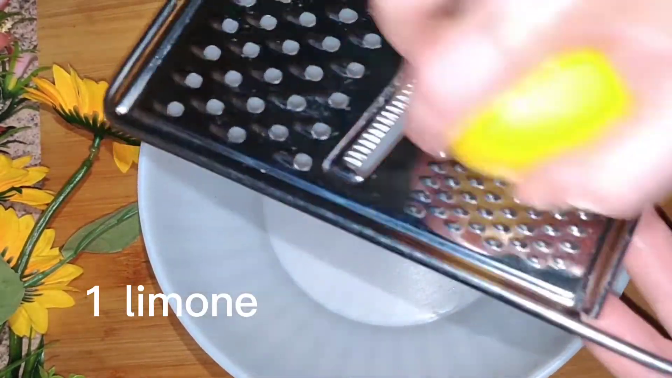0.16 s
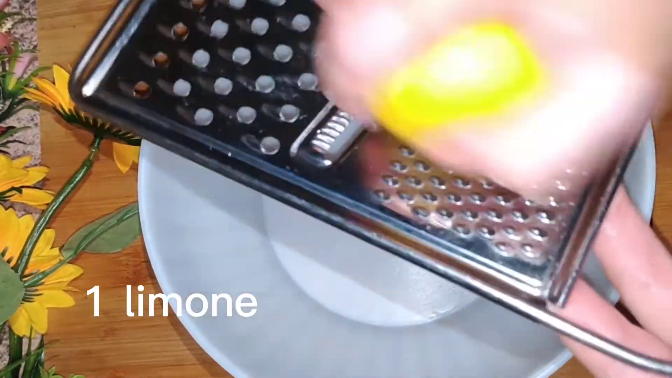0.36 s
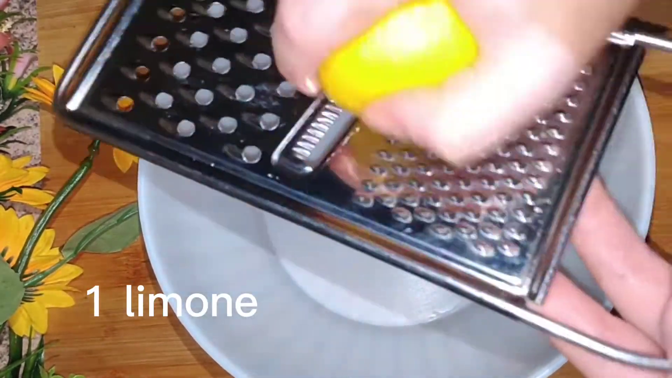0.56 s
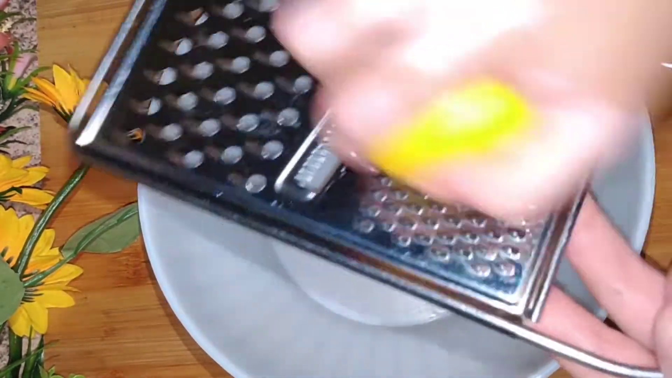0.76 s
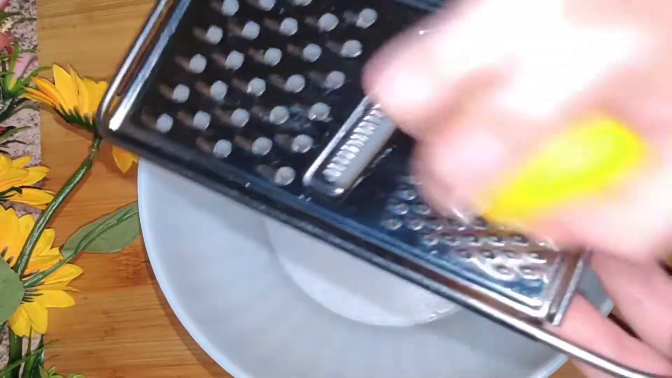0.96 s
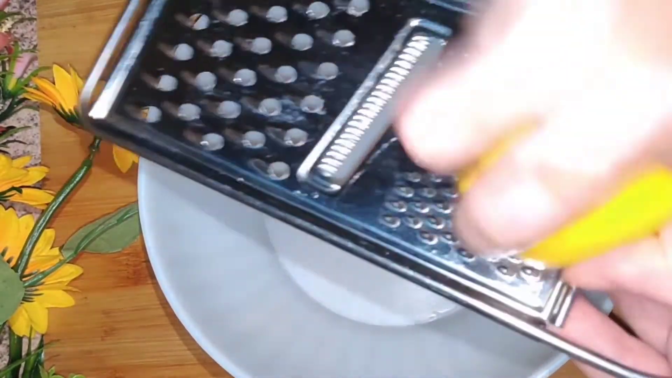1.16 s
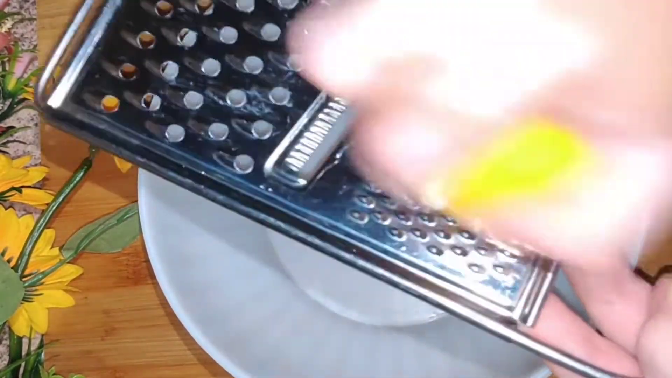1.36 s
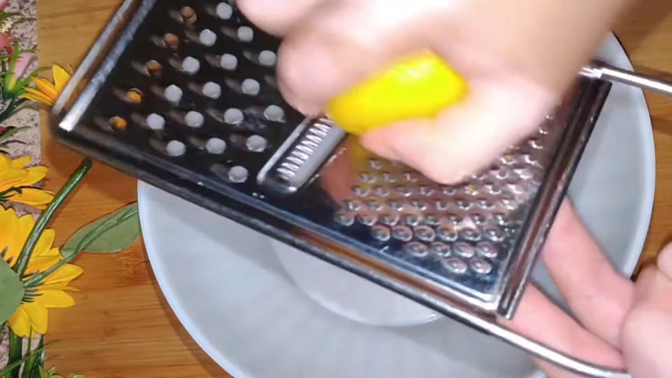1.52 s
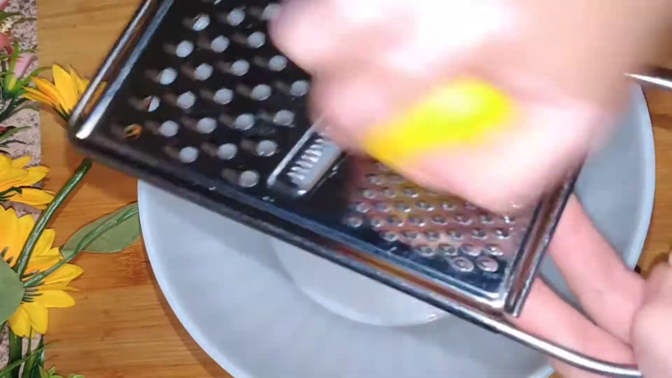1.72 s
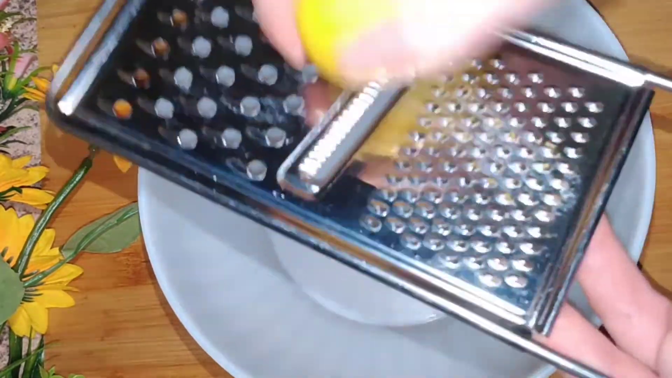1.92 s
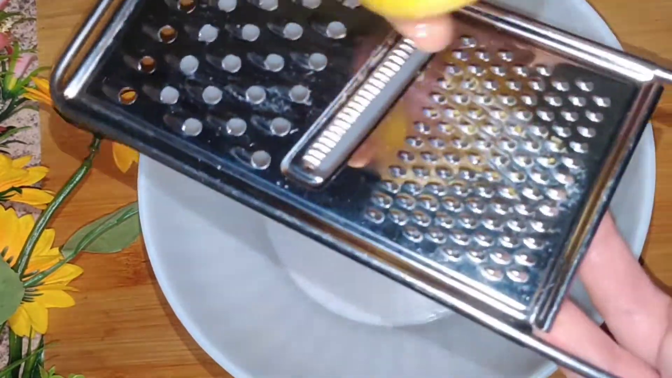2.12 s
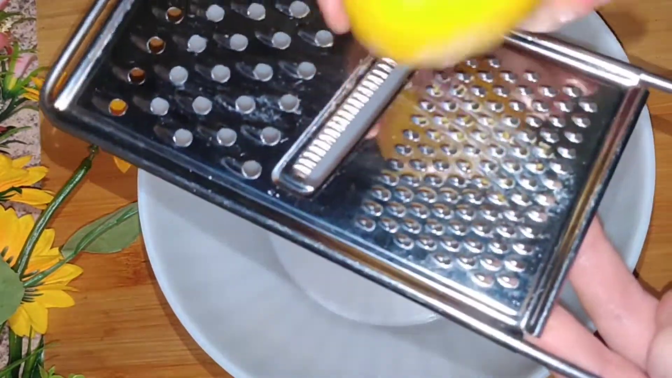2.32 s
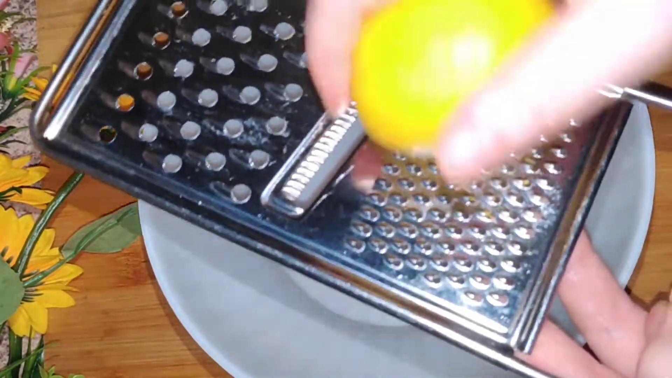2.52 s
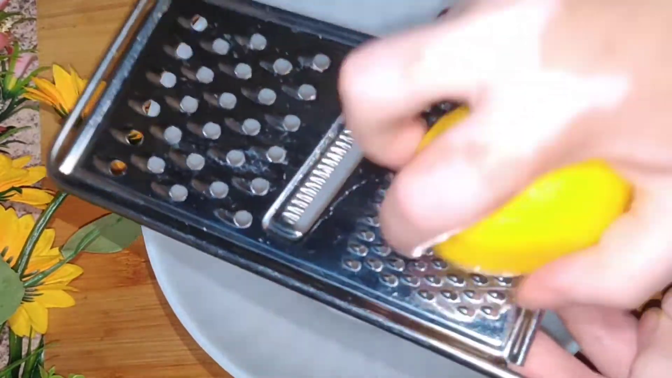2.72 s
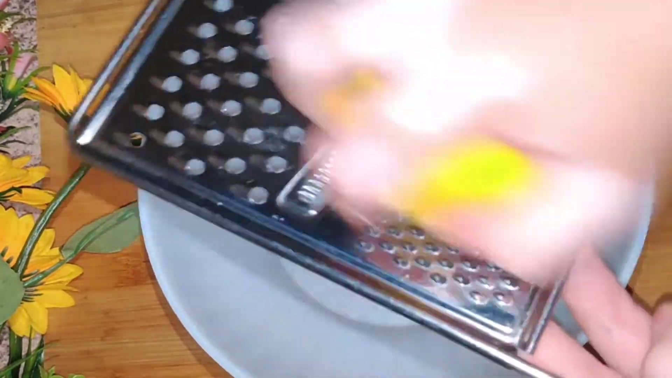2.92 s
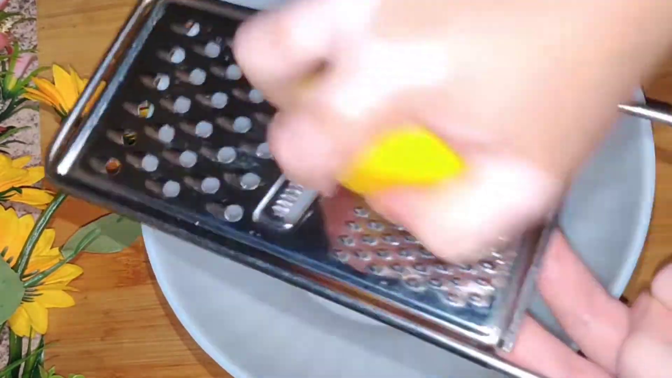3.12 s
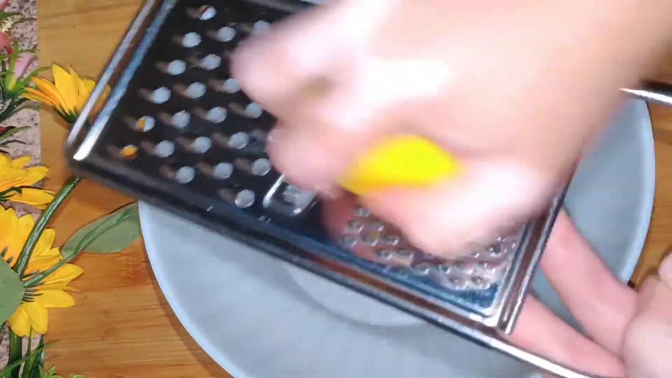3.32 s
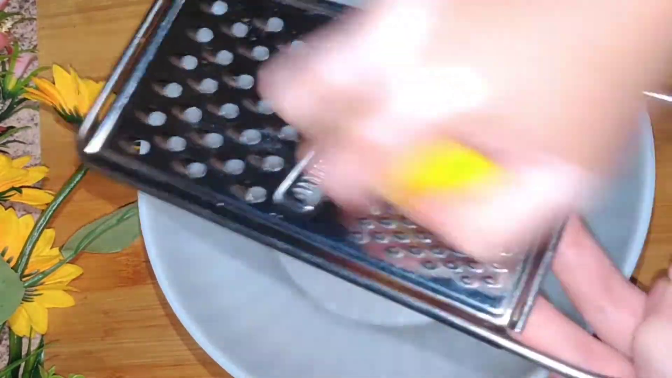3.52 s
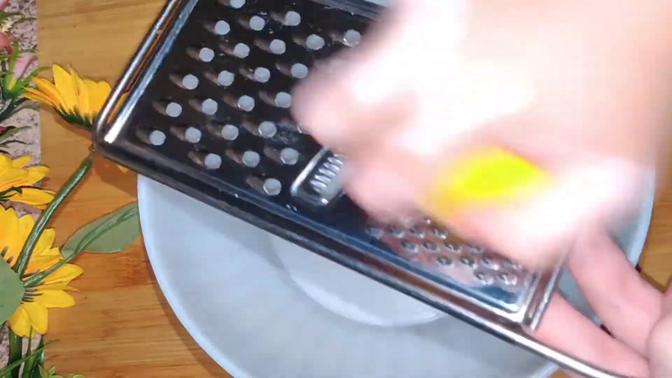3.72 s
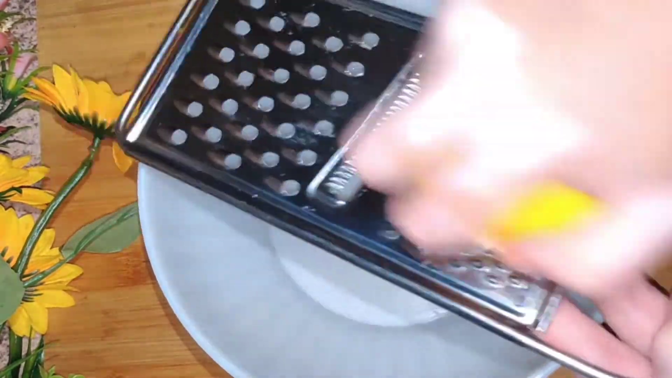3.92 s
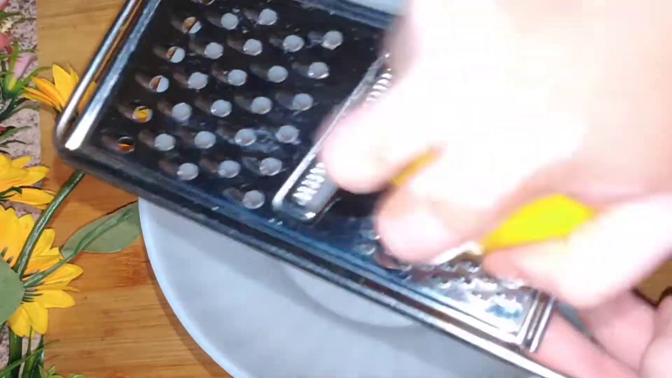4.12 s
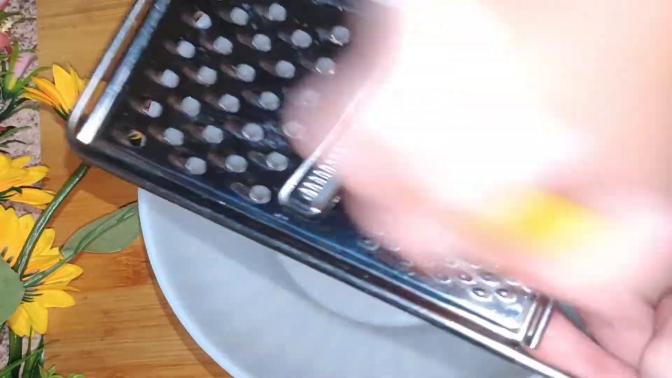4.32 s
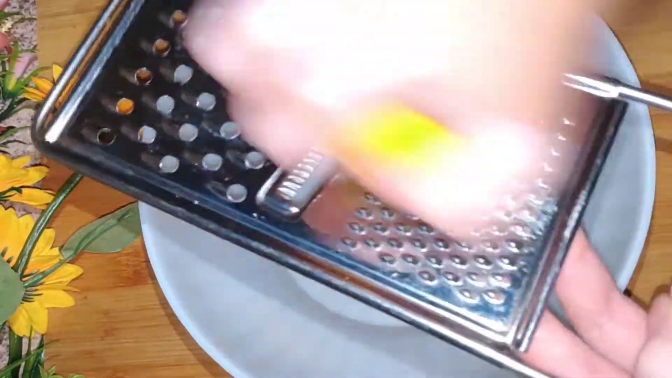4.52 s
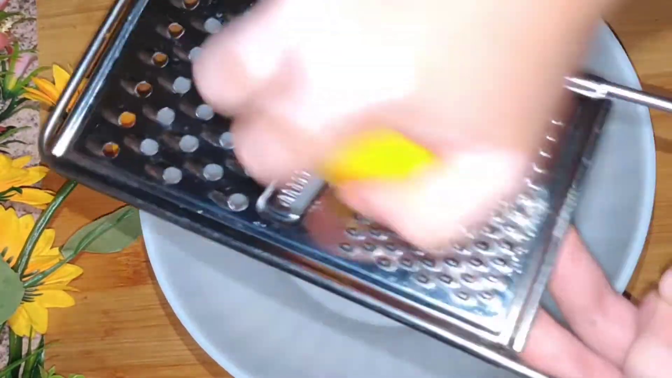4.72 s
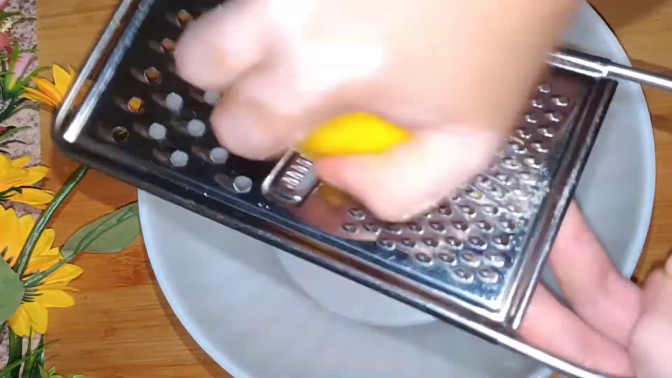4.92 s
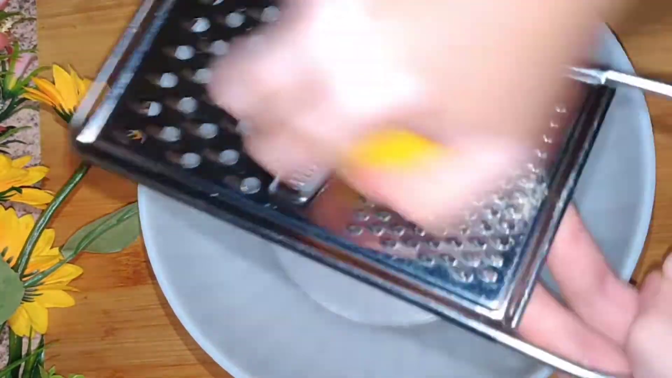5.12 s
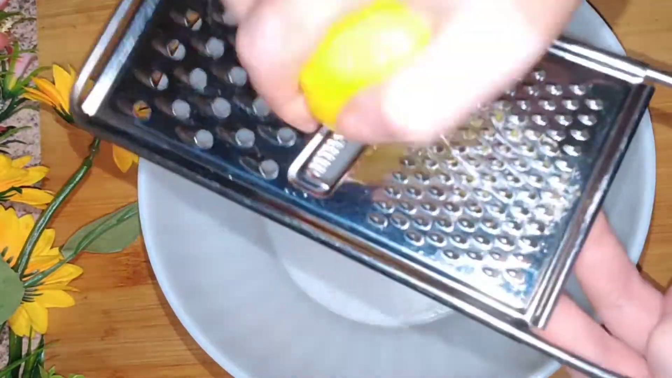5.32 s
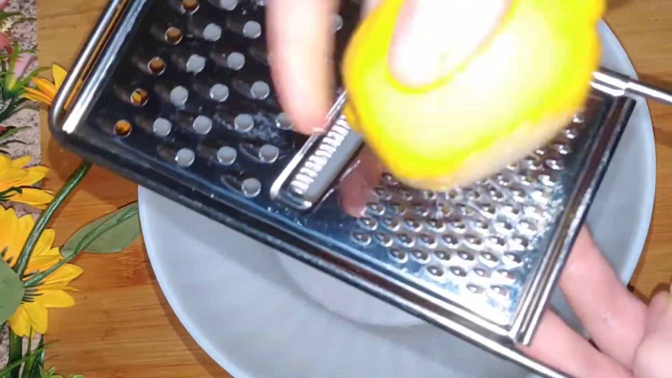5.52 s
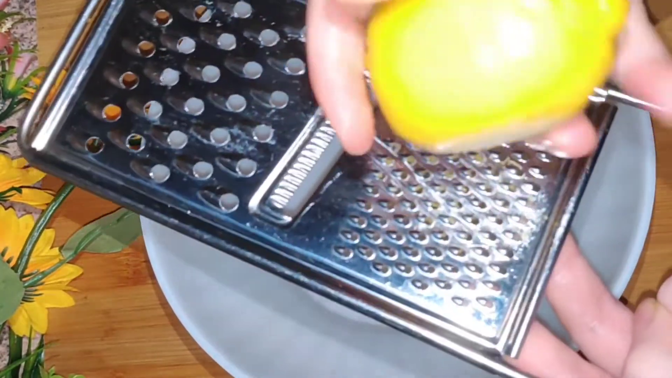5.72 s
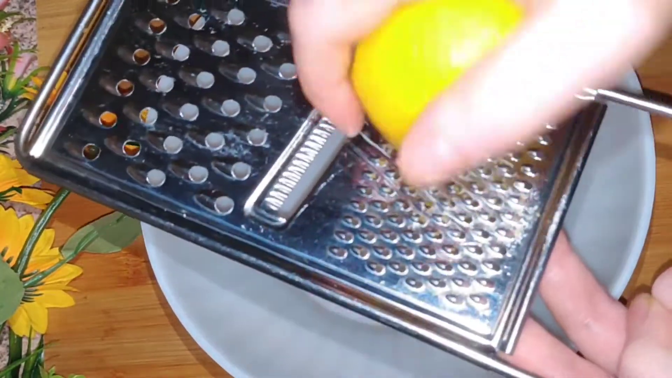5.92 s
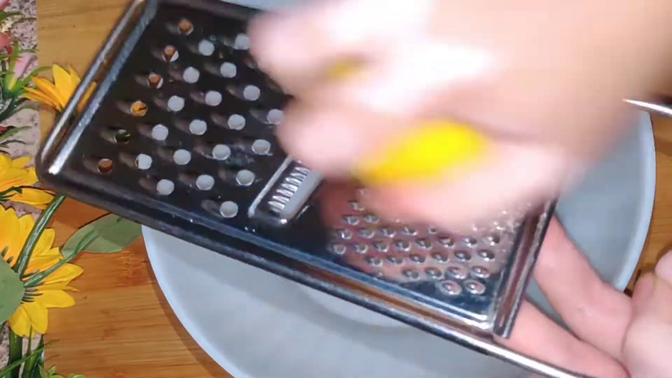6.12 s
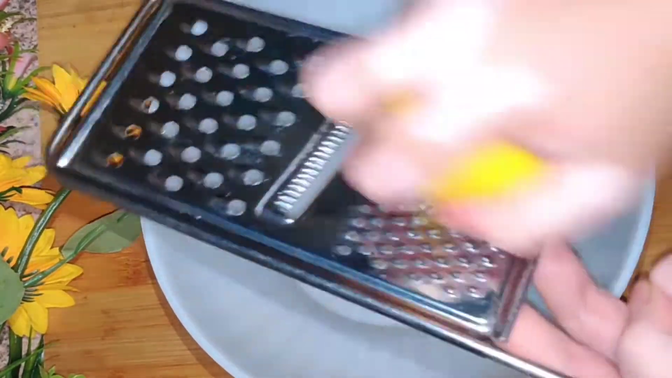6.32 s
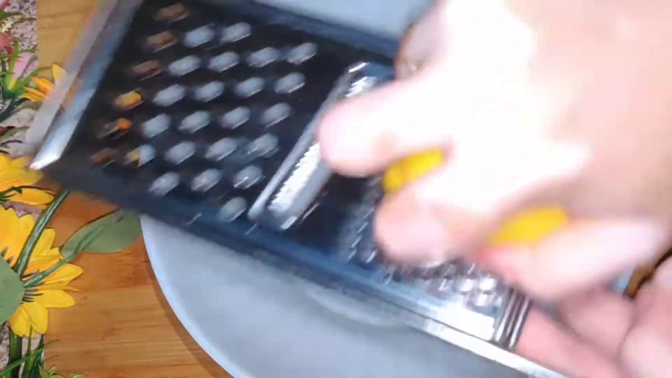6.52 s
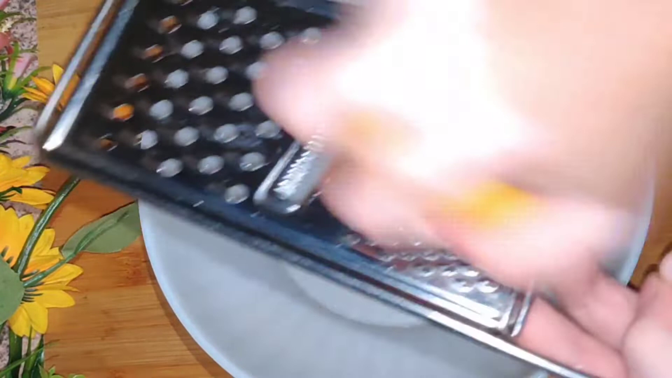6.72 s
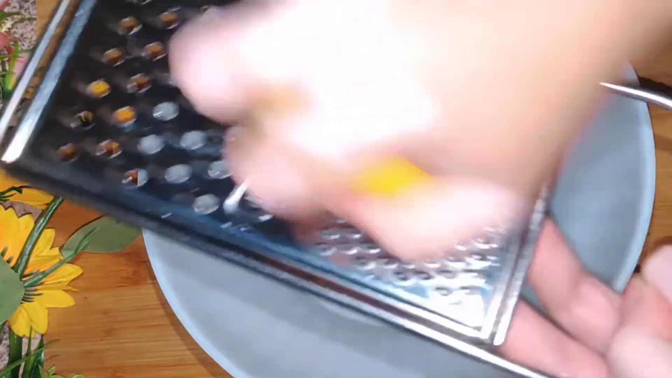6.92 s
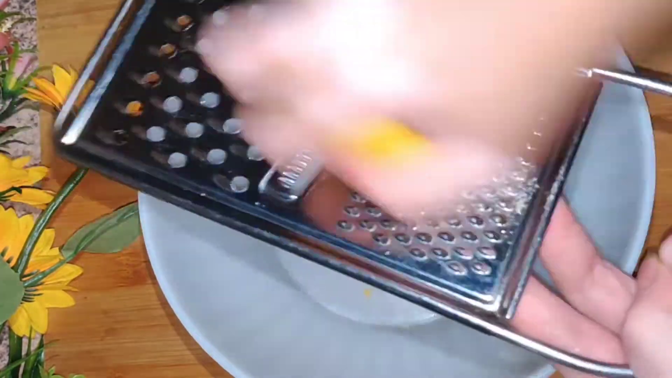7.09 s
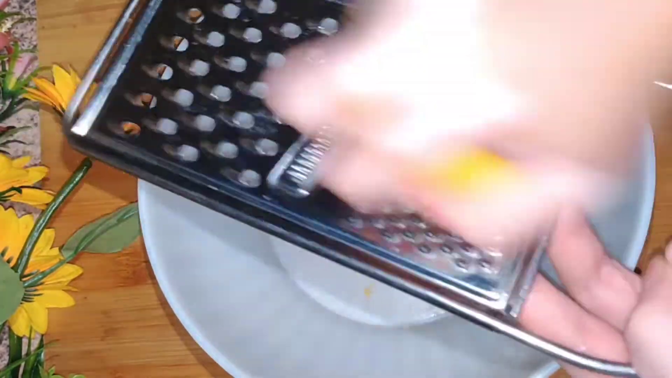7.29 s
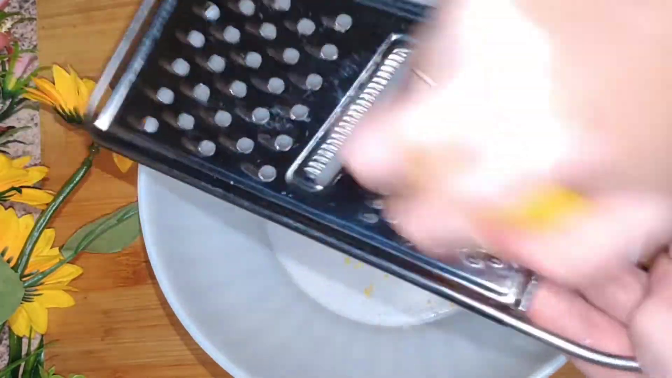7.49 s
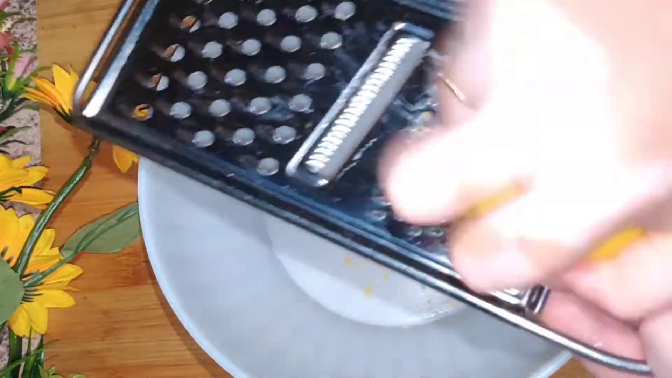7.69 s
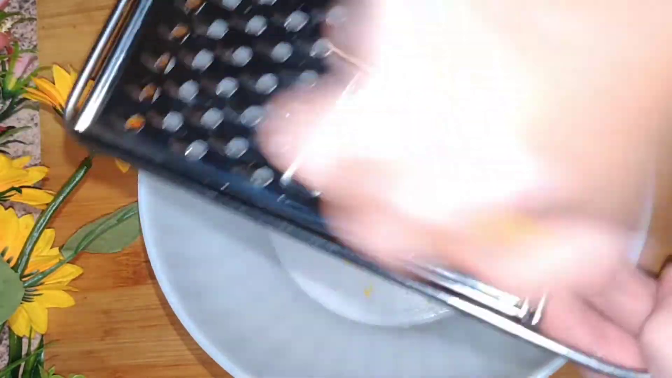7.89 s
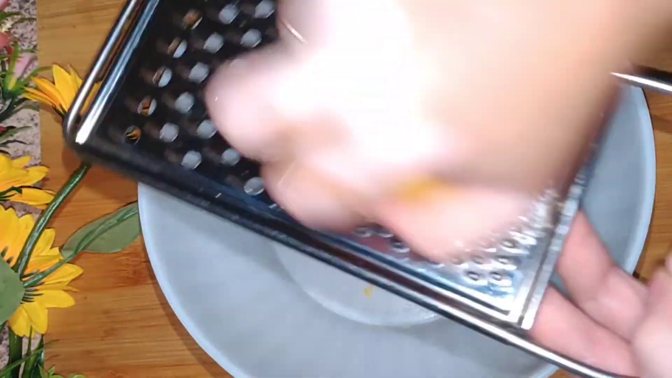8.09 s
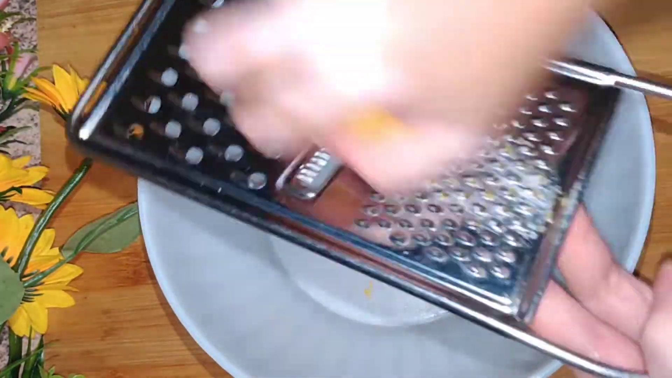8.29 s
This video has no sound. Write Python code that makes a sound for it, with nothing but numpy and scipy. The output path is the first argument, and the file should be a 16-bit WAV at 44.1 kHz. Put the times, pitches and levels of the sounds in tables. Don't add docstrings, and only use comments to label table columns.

```python
import sys
import numpy as np
from scipy import signal
from scipy.fft import rfft, irfft, next_fast_len
from scipy.io import wavfile
from scipy.ndimage import uniform_filter1d, map_coordinates

SR = 44100
rng = np.random.default_rng(int(sys.argv[2]) if len(sys.argv) > 2 else 0)


def transcribe(signal):
    frames = np.atleast_2d(signal).T
    limited = np.clip(frames, -1, 1)
    pcm = np.round(limited * 32767).astype(np.int16)
    wavfile.write(sys.argv[1], SR, pcm)


def to_linear_factor(level_db):
    exponent = np.asarray(level_db, float) / 20
    return 10 ** exponent


N = 368235

# [t/s, level/dB, hold/s, lean over the hold/dB]
CUT_STROKES = [(0.124, -45, 0.069, -9), (0.388, -40, 0.041, -7), (0.624, -36, 0.046, -2.5),
               (0.863, -34, 0.067, -4), (1.115, -32, 0.05, 6), (1.357, -30.5, 0.053, -3),
               (1.573, -29, 0.052, 0.5), (1.806, -27.5, 0.055, 6), (2.901, -37, 0.049, 8),
               (3.15, -33.5, 0.057, -5.0), (3.374, -29.5, 0.064, 2), (3.618, -29, 0.041, 7.5),
               (3.841, -27.5, 0.046, 2.5), (4.054, -26, 0.048, 7.5), (4.286, -25.5, 0.052, 1.5),
               (4.509, -25, 0.053, 0.5), (4.747, -26.5, 0.053, 1), (4.968, -25, 0.055, 2.5),
               (5.19, -26.5, 0.06, -6.5), (6.213, -37, 0.053, 2.5), (6.446, -36.5, 0.022, -9.5),
               (6.679, -30.5, 0.055, 2.5), (6.917, -31, 0.065, -4.5), (7.158, -25.5, 0.044, -0.5),
               (7.384, -27.5, 0.044, 5.5), (7.614, -26.5, 0.038, -1), (7.847, -30, 0.075, -12.5),
               (8.089, -26, 0.055, -2), (8.325, -25.5, 0.041, 1)]
FIRM_DB = -26.5


def unit(x):
    return x / np.sqrt(np.mean(x ** 2) + 1e-20)


def along(points, hz):
    f, value = np.transpose(points)
    return np.interp(np.log(hz + 1), np.log(f + 1), value)


def wobble(rate):
    knots = rng.standard_normal(int(N / SR * 400) + 4)
    return map_coordinates(knots, [np.arange(N) * min(rate, 400) / SR])


def filtered(x, response):
    m = next_fast_len(N + SR // 2)
    return irfft(rfft(x, m) * response(np.fft.rfftfreq(m, 1 / SR)), m)[..., :N]


def resonances(modes, f):
    total = 0
    for k, (centre, width, db) in enumerate(modes):
        damping = 1j * f * width
        total = total + (-1) ** k * to_linear_factor(db) * damping / (centre * centre - f * f + damping)
    return total


def spread(pair, likeness):
    def mid_side_gains(hz):
        angle = np.arccos(np.clip(along(likeness, hz), -1, 1)) / 2
        return np.array([np.cos(angle), np.sin(angle)])

    mid, side = filtered(pair, mid_side_gains)
    return np.array([mid + side, mid - side])


def pressure(rows, knee_db, land_s=1):
    out, t = np.zeros(N + SR), np.arange(-SR // 10, SR // 2) / SR
    soft = lambda db: knee_db * np.logaddexp(0, db / knee_db)
    for s, db, length, lean_db, rise, fall in rows:
        lean = lean_db * np.clip(t / length - 0.5, -0.5, 0.5)
        landing = 1000 * 2 * np.minimum(t + land_s, 0)
        edges = soft(-1000 * rise * t) + soft(1000 * fall * (t - length))
        out[round(s * SR):][:len(t)] += to_linear_factor(db + lean + landing - edges)
    return out[SR // 10:][:N]


def strokes():
    # [t/s, level/dB, hold/s, lean over the hold/dB]
    return_strokes = [(0.25, -57, 0.057, -6), (0.496, -52, 0.054, 1), (0.746, -49.5, 0.056, -9.5),
                      (0.971, -50, 0.091, -4), (1.248, -44, 0.045, -5.5), (1.465, -50, 0.042, 9),
                      (1.698, -47, 0.064, -10.5), (3.03, -54, 0.067, -6.5), (3.25, -52, 0.059, 10.5),
                      (3.518, -49, 0.05, -3), (3.743, -49.5, 0.063, -14), (3.969, -39, 0.032, -3),
                      (4.184, -42, 0.047, -1), (4.42, -36.5, 0.039, -5.5), (4.653, -38, 0.042, -6),
                      (4.872, -39, 0.048, -3.5), (5.094, -37.5, 0.044, -2), (6.31, -52, 0.071, 2.5),
                      (6.585, -53.5, 0.028, -3), (6.812, -45.5, 0.053, -7), (7.056, -43.5, 0.049, -6.5),
                      (7.296, -41, 0.039, -3), (7.521, -36.5, 0.032, 1), (7.748, -37, 0.043, -4),
                      (7.985, -40.5, 0.053, -2.5), (8.217, -40.5, 0.052, 1)]
    # [t/s, level/dB, hold/s, lean/dB, fall/dB per ms]
    peel_drags = [
        (0.02, -71, 0.065, 4, 0.3),
        (1.89, -50.5, 0.04, -4, 0.12),
        (2.0, -60, .09, -5, .09),
        (2.72, -76, 0.11, -3, 0.2),
        (5.3, -59.5, .075, 1, 0.22),
        (5.96, -75, 0.17, 1.5, .3),
    ]
    reach_s, lift_db = 0.086, 29
    cuts = []
    for s, db, hold, lean in CUT_STROKES:
        bite = max(1.5 + 0.061 * (db - FIRM_DB), 0.4)
        lift = lift_db / 1000 / max(reach_s - hold, 0.008)
        cuts.append((s, db, hold, lean, bite, lift))
    returns = [(*row, 0.75, 1) for row in return_strokes]
    drags = [(*row[:4], 0.1, row[4]) for row in peel_drags]
    return (pressure(cuts, knee_db=3.0, land_s=0.018), pressure(returns, knee_db=5.5),
            pressure(drags, knee_db=2.5))


def floor():
    # [f/Hz, density/dB per Hz]
    air_colour = [(15, -32), (25, 1), (50, -5.5), (80, -10), (150, -14.5), (270, -18.5), (500, -21.5),
                  (1000, -25.5), (1700, -28.5), (3000, -27), (6500, -26), (8500, -30.5), (12000, -29.5),
                  (15800, -29)]
    # [f/Hz, likeness]
    air_likeness = [(60, 0.24), (200, .35), (600, 0.044)]
    air = filtered(rng.standard_normal((2, N)), lambda hz: to_linear_factor(along(air_colour, hz)))
    return to_linear_factor(-67 + 2.5 + 0.6 * wobble(6)) * unit(spread(air, air_likeness))


def kitchen(x):
    # [f/Hz, t60/s]
    room_decay = [(200, 0.72), (800, 0.38), (3000, 0.36), (7000, 0.34), (14000, 0.31)]
    out, step = np.zeros((2, N + SR)), SR // 3
    for at in range(0, N, step):
        hz, t, z = signal.stft(rng.standard_normal((2, SR // 2)), SR, nperseg=256)
        decay = to_linear_factor(-60 * t / along(room_decay, hz)[:, None])
        tail = signal.istft(z * decay, SR, nperseg=256)[1]
        tail = tail / np.linalg.norm(tail[0])
        wet = signal.fftconvolve(x[::-1, at:at + step], tail, axes=1)
        out[:, at + SR // 200:][:, :wet.shape[1]] += wet
    return out[:, :N]


def table():
    # [t/s, peak/dB]
    lurches = [
        (.16, -46),
        (1.79, -60),
        (2.25, -62),
        (4.05, -61),
        (4.98, -58),
        (5.23, -59),
        (6.239, -52),
        (7.21, -54),
        (7.74, -54),
        (8.14, -62),
    ]
    out, t = np.zeros(N + SR), np.linspace(-0.05, 0.05, SR // 10)
    push = -t / 0.012 * np.exp(-(t / 0.018) ** 2)
    for s, db, *_ in CUT_STROKES:
        start = round((s - 0.018) * SR + 0.05 * SR)
        out[start:][:len(t)] += to_linear_factor(0.87 * db - 26.5 + rng.normal(0, 2.5)) * push
    sway = np.abs(uniform_filter1d(sum(strokes()), round(0.22 * SR))) / to_linear_factor(FIRM_DB)
    weight = to_linear_factor(-62.5 + 2.9 * wobble(6)) * sway ** 0.4
    for s, db in lurches:
        since = np.arange(N) / SR - s
        weight = weight + to_linear_factor(db) * np.exp(np.minimum(since / 0.03, -since / 0.07))
    table_modes = [(30, 27, -1.8), (50, 11, -0.16)]
    shake = filtered(rng.standard_normal((2, N)), lambda hz: resonances(table_modes, hz))
    rumble = to_linear_factor(-4.5) * weight * unit(spread(shake, [(40, 1.0)]))
    return (out[SR // 10:][:N] + rumble) * to_linear_factor([[1.2], [-1.2]])


def touches():
    # [t/s, peak/dB, length/s, centre f/Hz]
    scuffs = [(2.335, -62.5, 0.024, 5070), (2.459, -69, 0.019, 4000), (5.403, -50.5, 0.0085, 2410),
              (5.494, -59.5, 0.017, 2480), (5.565, -63, 0.0079, 4920), (5.662, -62, 0.047, 5030),
              (5.75, -60, 0.015, 5900), (5.894, -61, 0.0083, 3510), (6.111, -55, 0.0092, 494),
              (6.114, -53.5, 0.0055, 5020), (6.45, -49, 0.018, 160)]
    out, t = np.zeros((2, N + SR)), np.arange(SR // 5) / SR
    for s, db, length, hz in scuffs:
        band = signal.butter(2, [hz / 3.0, hz * 1.3], "bp", fs=SR)
        puff = unit(signal.lfilter(*band, rng.standard_normal((2, len(t)))))
        swell = (t / length) * np.exp(1 - 2 * t / length)
        out[:, round(s * SR):][:, :len(t)] += to_linear_factor(db) * puff * swell
    return out[:, :N]


def knocks():
    # [t/s, peak/dB]
    blows = [
        (0.1015, -22),
        (4.0387, -17.5),
    ]
    # [f/Hz, level/dB, t60/s]
    rim_modes = [(374, -9.5, 0.039), (650, -7, 0.03), (723, -1.5, 0.033), (867, -2, 0.027),
                 (1050, -5.5, 0.03), (1183, -4.5, .018), (1360, -7.5, 0.028), (1960, -9, .018),
                 (2610, -12.5, 0.026), (3320, -13.5, 0.021), (4000, -17.5, .015), (5400, -15, 0.012),
                 (6760, -7.5, .016)]
    # [delay/s, level/dB]
    early_echoes = [
        (.0015, -4.5),
        (.0048, -12),
        (.0095, -9),
        (0.012, -15),
    ]
    # [f/Hz, width/Hz, level/dB]
    rocking_modes = [(370, 120, -7), (644, 160, -2), (900, 180, -2)]
    out, t = np.zeros((2, N + SR)), np.arange(SR // 3) / SR
    rocking = unit(filtered(rng.standard_normal((2, N)), lambda hz: resonances(rocking_modes, hz)))
    for s, db in blows:
        at = round(s * SR)
        out[:, at:at + len(t)] += to_linear_factor(db - 20 - 60 * t / 0.4) * rocking[:, at:at + len(t)]
        ring = 0
        for hz, level_db, t60 in rim_modes:
            decay = to_linear_factor(level_db + rng.normal(0, 1.7) - 60 * t / t60)
            ring = ring + decay * np.sin(2 * np.pi * hz * t)
        rattle = to_linear_factor(-15.5 - 60 * t / 0.025) * rng.standard_normal((2, len(t)))
        thud = to_linear_factor(-23 - 60 * t / 0.55) * np.sin(2 * np.pi * 56 * t)
        contact = 1 - np.exp(-t / 0.00015)
        blow = -to_linear_factor(db - 3.5) * (ring + rattle + thud) * contact
        for late, loss_db in [(0, 0)] + early_echoes:
            sway = to_linear_factor(rng.normal(0, 0.79, (2, 1))) if late else 1
            out[:, round((s + late) * SR):][:, :len(t)] += to_linear_factor(loss_db) * sway * blow
    left_lag = round(0.00007 * SR)
    return np.array([np.roll(out[0], left_lag), out[1]])[:, :N]


def fibres(spiky_db, patchy_db):
    size_db = spiky_db * np.minimum(rng.exponential(size=(2, N)), 4.5)
    tears = rng.standard_normal((2, N)) * to_linear_factor(size_db)
    z = signal.stft(tears, nperseg=256)[2]
    patches = uniform_filter1d(rng.standard_normal(z.shape[1:]), size=3, axis=0)
    patches = uniform_filter1d(patches, size=8, axis=1)
    return unit(signal.istft(z * to_linear_factor(patchy_db * unit(patches)), nperseg=256)[1][:, :N])


def grating():
    # [f/Hz, density/dB per Hz]
    tear_colour = [(710, -30.5), (1200, -21), (1320, -12.5), (1640, -17.5), (1790, -14), (2500, -10.5),
                   (2870, -3), (4190, -3.5), (4470, -3), (6600, -1.5), (8540, -12), (14500, -17.5),
                   (15800, -22)]
    # [f/Hz, density/dB per Hz]
    slide_colour = [(710, -39.5), (1200, -19), (2150, -12.5), (2340, -9.5), (2550, -8.5), (3030, -5.5),
                    (6320, -2), (9420, -13.5), (14800, -17), (15800, -27.5)]
    # [f/Hz, width/Hz, level/dB]
    sheet_modes = [(2310, 130, -6.5), (2972, 99, 1.5), (3880, 160, -11), (4726, 38, 2.5), (5546, 85, -3),
                   (5520, 140, -1), (6496, 30, -2), (6540, 41, 7.5), (7260, 260, -8.5), (9940, 86, -10.5),
                   (10400, 180, -24)]
    # [f/Hz, width/Hz, level/dB]
    fine_teeth = [(6100, 2600, -0.2)]
    # [f/Hz, width/Hz, level/dB]
    bowl_modes = [(98, 50, -4.5), (225, 34, -3.5), (380.4, 79, -0.5), (776, 96, 0.5), (980, 240, -0.5),
                  (1420, 880, -4.5), (1970, 150, -0.5)]
    # [f/Hz, likeness]
    near_likeness = [(100, 0.9), (400, 0.97), (1000, 0.28), (2500, 0.2), (6000, 0.18), (14000, 0.2)]
    catching = to_linear_factor(0.9 * wobble(60) + 0.92 * wobble(300))
    rows_per_s = 150 * to_linear_factor(3.1 * wobble(25))
    row_phase = np.cumsum(rows_per_s) / SR % 1
    snag = to_linear_factor(2 * (0.5 - row_phase))
    cut, back, drag = catching * snag * strokes()

    sheet = lambda hz: 1 + to_linear_factor(-2) * resonances(sheet_modes, hz)
    tearing = lambda hz: to_linear_factor(along(tear_colour, hz)) * sheet(hz)
    sliding = lambda hz: to_linear_factor(along(slide_colour, hz)) * sheet(hz)
    dragging = lambda hz: to_linear_factor(along(slide_colour, hz)) * (0.37 + resonances(fine_teeth, hz))
    tear = cut * unit(filtered(fibres(spiky_db=1.5, patchy_db=2.16), tearing))
    slide = back * unit(filtered(fibres(spiky_db=0.3, patchy_db=0.5), sliding))
    slide += drag * unit(filtered(fibres(spiky_db=-1.0, patchy_db=0.5), dragging))

    hum = lambda hz: resonances(bowl_modes, hz)
    swing = ((cut + to_linear_factor(3.5) * back) / to_linear_factor(FIRM_DB)) ** 0.8
    force = to_linear_factor(FIRM_DB - 19 + 0.93 * wobble(3.6)) * swing
    norm = np.std(filtered(rng.standard_normal(N), hum))
    bowl = filtered(force * fibres(spiky_db=1.5, patchy_db=2.5), hum) / norm
    return spread(to_linear_factor(1.5) * (tear + slide) + bowl, near_likeness)


def scene():
    rub, blows = grating() + touches(), knocks()
    room = kitchen(to_linear_factor(-13.0) * rub + to_linear_factor(-14) * blows)
    return rub + blows + room + table() + floor()


def thinned(x):
    # [f/Hz, share]
    weak_share = [(1000, .3), (6500, .4), (8500, 0.96), (15000, 0.98)]
    # [f/Hz, share]
    dropped_share = [(1800, 0), (2600, .02), (4200, .04), (5500, .02), (7000, .02), (8500, .08),
                     (14000, .08), (15000, .15), (15500, .4)]
    hz, t, z = signal.stft(x, SR, nperseg=1024)
    band = np.arange(len(hz)) // 6
    offset = rng.integers(4, size=(band[-1] + 1, 1))
    stretch = (np.arange(len(t)) + offset) // 4
    luck = np.take_along_axis(rng.random(stretch.shape), stretch, axis=1)[band]
    size = np.sqrt(np.sum(np.abs(z) ** 2, axis=0))
    strong = size > along(weak_share, hz)[:, None] * uniform_filter1d(size, size=16, axis=0)
    kept = luck > along(dropped_share, hz)[:, None]
    return signal.istft(z * strong * kept, SR, nperseg=1024)[1][:, :N]


def roll_off(x):
    return signal.sosfilt(signal.butter(12, 16390, fs=SR, output="sos"), x)


def record(dry):
    # [f/Hz, left minus right/dB]
    port_tilt = [(60, 1.5), (92, 6), (140, -2.5), (210, 2.5), (330, 6.5), (500, 1.5), (770, -4.5),
                 (1170, 0.5), (1790, -1), (2740, -1), (4190, 2), (6410, -6.5), (9810, -4.5), (15000, 0.5)]
    # [f/Hz, lead of the left/rad]
    port_lead = [(0, -0.13), (1290, -0.9), (1550, -2), (1980, 0.2), (2930, 0), (3620, 3.5), (5510, -1.5),
                 (6030, 5.5), (8960, 12.5), (10200, 15.5), (12000, 16.5), (14400, 20), (15300, 13),
                 (15900, 22.5)]
    side = np.array([[0.5], [-0.5]])

    def port_response(hz):
        lead = np.interp(hz, *np.transpose(port_lead))
        return to_linear_factor(side * along(port_tilt, hz)) * np.exp(1j * side * lead) * (hz < 15750)

    return roll_off(thinned(filtered(dry, port_response)))


dry = scene()
out = record(dry)
transcribe(out)
```